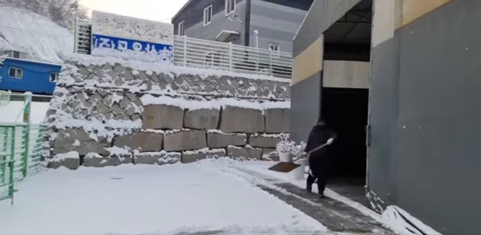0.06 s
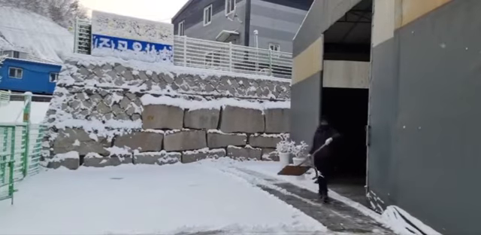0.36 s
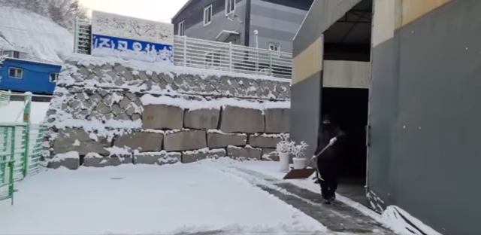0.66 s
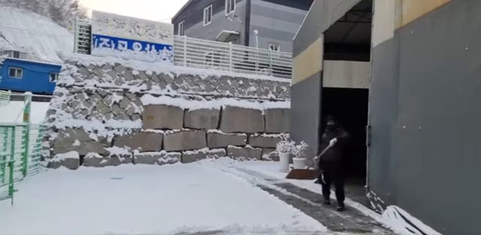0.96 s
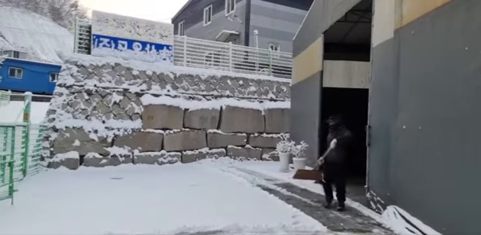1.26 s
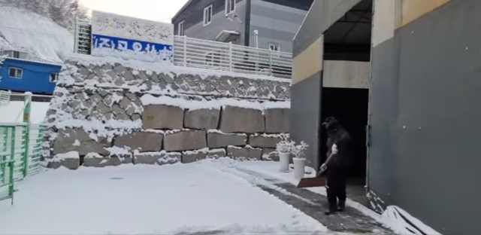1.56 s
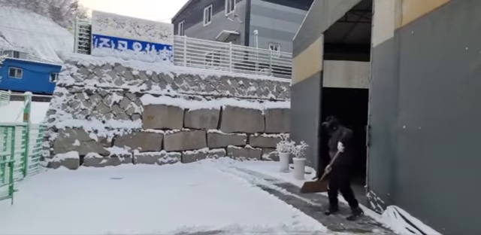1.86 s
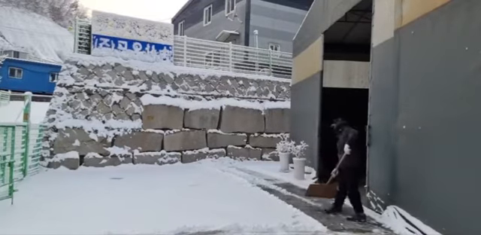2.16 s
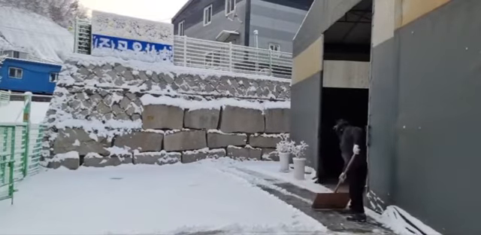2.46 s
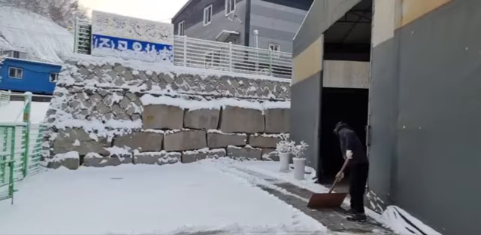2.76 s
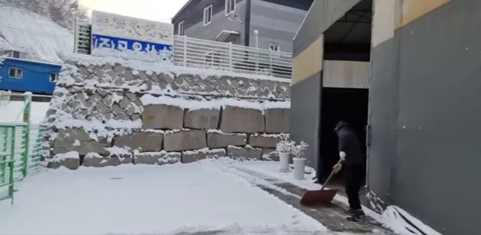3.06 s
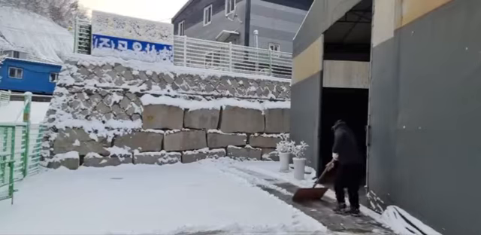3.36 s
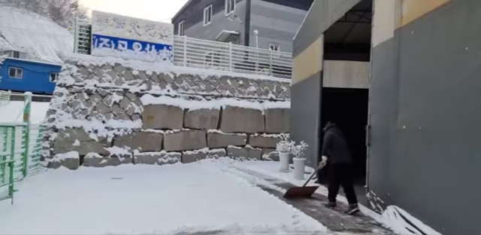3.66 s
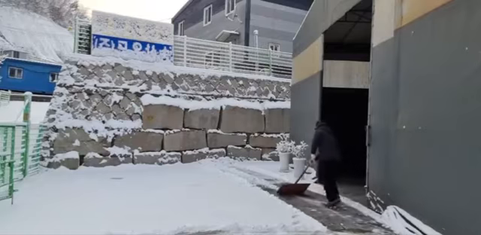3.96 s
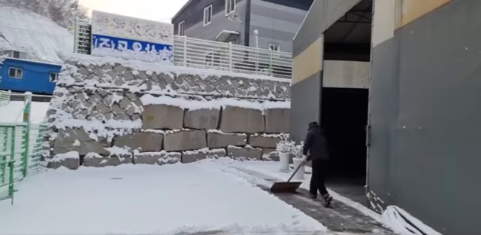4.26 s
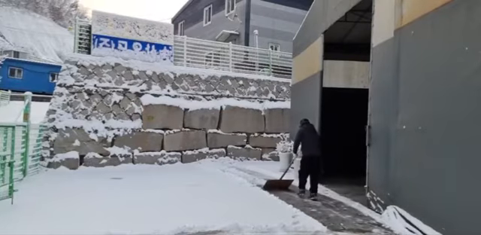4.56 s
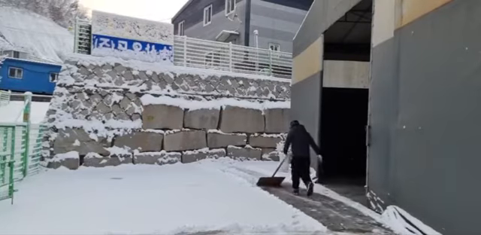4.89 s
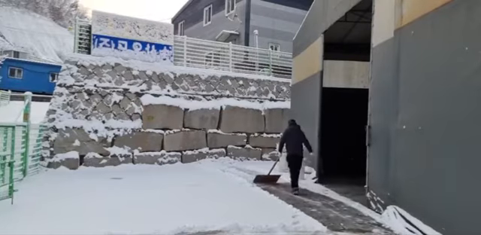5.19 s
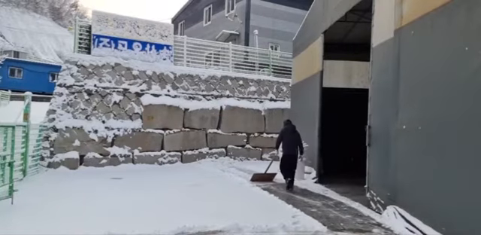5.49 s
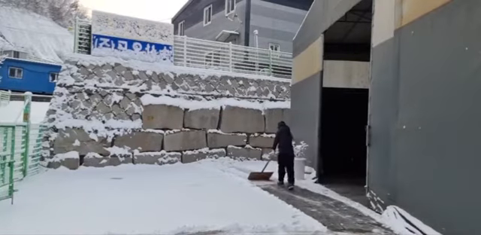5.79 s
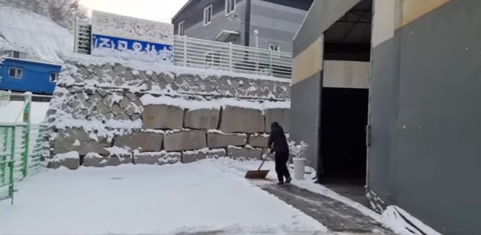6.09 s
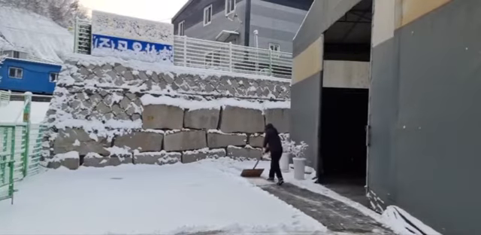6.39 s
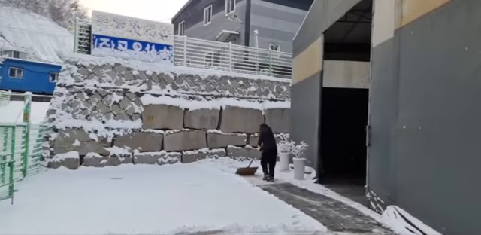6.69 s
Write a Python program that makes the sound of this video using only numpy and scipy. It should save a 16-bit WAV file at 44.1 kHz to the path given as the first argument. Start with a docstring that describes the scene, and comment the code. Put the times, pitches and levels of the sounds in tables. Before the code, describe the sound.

A plastic snow shovel scrapes over snowy pavers outdoors. First come a few quiet, crunching footsteps with sharp little clicks of grit, then a knock as the blade meets the ground. The push follows, a juddering rasp with a hollow rumble and a cluster of icy snaps in the middle, growing lighter as it moves off from the microphone. A faint, distant hum continues throughout.

```python
"""A plastic snow shovel is set down with a knock and pushed over snowy paving in a walled yard.
Its edge sticks and slips, rasping on the pavers, skimming now and then and cracking through frozen
crust, while bumps drum on the hollow scoop. Before the push, a few steps crunch on snow and grit,
and at the very start the carried shovel rattles faintly. A low outdoor hum lies underneath."""
import sys
import numpy as np
from scipy import signal
from scipy.fft import rfft, irfft
from scipy.io import wavfile

SR = 44100
rng = np.random.default_rng(int(sys.argv[2]) if len(sys.argv) > 2 else 0)


def dump_mix(stems):
    """Bounce the given channels to the path in sys.argv[1] as a 16-bit WAV at rate SR."""
    frames = np.atleast_2d(stems).T  # one column per channel
    limited = np.clip(frames, -1, 1)  # hard clip at full scale
    pcm = np.round(limited * 32767).astype(np.int16)
    wavfile.write(sys.argv[1], SR, pcm)


N = 297234


def from_db(db):
    """Decibels to gain."""
    return 10 ** (np.asarray(db) / 20)


def rms_one(x):
    """Scale to unit rms."""
    return x / np.sqrt(np.mean(x ** 2) + 1e-20)


def add(track, s, sound):
    """Lay a short sound into a track at s seconds."""
    at = round(s * SR)
    track[..., at:at + sound.shape[-1]] += sound[..., :N - at]


def gains(rows, before=None):
    """One gain curve for each dB column of a table."""
    s, *columns = np.transpose(rows)
    return [from_db(np.interp(np.arange(N) / SR, s, db, before)) for db in columns]


def swell(s, hold_s, attack_s, release_db_per_s):
    """Envelope of a contact: it builds, holds and dies away."""
    t = np.arange(N) / SR - s
    return np.clip(t / attack_s, 0, 1) * from_db(-release_db_per_s * np.maximum(t - hold_s, 0))


def burst(rise_s, t60):
    """Envelope of something that gives way within milliseconds and then crumbles."""
    t = np.arange(SR // 4) / SR
    return (1 - np.exp(-(t / rise_s) ** 2)) * from_db(-60 * t / t60)


def drift(rate_hz):
    """Smooth random modulation; rms 1."""
    pole = np.exp(-80 * np.pi * rate_hz / SR)
    slow = signal.lfilter([1], [1, -2 * pole, pole * pole], rng.standard_normal(N // 40 + 2002))[2000:]
    return np.interp(np.arange(N) / 40, np.arange(len(slow)), rms_one(slow))


def grains(per_s, spread_db):
    """Tiny impulses at random moments, a few larger than the rest; rms 1."""
    sizes = from_db(spread_db * np.minimum(rng.exponential(1, N), 4))
    return rms_one((rng.random(N) < per_s / SR) * sizes * rng.choice([-1, 1], N))


def response(spectrum, size=4096):
    """Minimum-phase impulse response of an EQ curve, falling 30 dB an octave beyond its ends."""
    hz, db = np.transpose(spectrum)
    octave = np.log2(np.maximum(np.arange(size // 2 + 1), .5) * SR / size)
    points = np.log2(hz)
    beyond = np.abs(octave - np.clip(octave, points[0], points[-1]))
    level = np.interp(octave, points, db) - 30 * beyond
    cepstrum = irfft(np.log(from_db(level) + 1e-5))
    cepstrum[1:size // 2] *= 2
    cepstrum[size // 2 + 1:] = 0
    return irfft(np.exp(rfft(cepstrum)))


def colour(x, spectrum):
    """Shape white sound with an EQ curve, keeping its power."""
    impulse = response(spectrum)
    return signal.oaconvolve(x, impulse / np.linalg.norm(impulse))[:N]


def ring(x, hz, t60):
    """One mode: a unit click starts a decaying sine of height 1."""
    pole, angle = from_db(-60 / (t60 * SR)), 2 * np.pi * hz / SR
    return signal.lfilter([0, np.sin(angle)], [1, -2 * pole * np.cos(angle), pole * pole], x + 1e-18)


def resonance(x, hz, width_hz):
    """Resonant band-pass with unity gain at its peak."""
    return signal.lfilter(*signal.iirpeak(hz, hz / width_hz, fs=SR), x + 1e-18)


# EQ of the outdoor bed: f/Hz, level/dB
HUM_EQ = [(25, 2), (45, -1), (70, 2), (105, -1.5), (150, 1), (210, -7), (305, -4.5), (430, -12), (560, -19),
          (850, -27), (1150, -37), (2500, -42), (7000, -47), (14000, -42)]
# Fader ride of the bed: t/s, level/dB, deep bass boost/dB
HUM_RIDE = [(0, -52, 3.5), (.6, -52, 0), (.9, -52.5, 0), (1.4, -52, 2), (1.9, -53.5, -1.5),
            (2.4, -47, -8.5), (2.65, -46, -5), (5.8, -50.5, -6)]
def outdoor_hum(trim_db=-2.0, bass_hz=204):
    """Distant low hum with a trace of hiss; its deep bass swells and sinks."""
    level, bass_gain = gains(HUM_RIDE)
    air = colour(rng.standard_normal(N), HUM_EQ)
    bass = signal.sosfiltfilt(signal.butter(2, bass_hz, fs=SR, output="sos"), air)
    return from_db(trim_db) * level * (air + (bass_gain - 1) * bass)


def yard(x, t60=0.16, send_db=-17.5, predelay_s=0.0161):
    """The walls add a short, faint tail."""
    t = np.arange(SR) / SR
    tail = rng.standard_normal(SR) * from_db(-60 * t / t60) * (t > predelay_s)
    band = signal.butter(1, [400, 6000], "band", fs=SR, output="sos")
    tail = signal.sosfilt(band, tail / np.linalg.norm(tail))
    return x + from_db(send_db) * signal.oaconvolve(x, tail)[:N]


# Fader ride of the rattle: t/s, level/dB
RATTLE_RIDE = [(0, -65), (.04, -63), (.1, -75.5), (.18, -70.5), (.23, -85), (.3, -120)]
# Thin modes of the carried shovel: f/Hz, level/dB, t60/s
RATTLE_MODES = [(1555, -11, 0.15), (1830, -5, 0.046), (2350, 2, 0.027), (2590, -7, 0.052),
                (2870, -11, 0.055), (3970, -6, 0.038)]
def rattle():
    """Light, quick touches keep the carried shovel ringing."""
    level, = gains(RATTLE_RIDE)
    touches = grains(per_s=770, spread_db=0.5)
    return level * rms_one(sum(from_db(db) * ring(touches, hz, t60) for hz, db, t60 in RATTLE_MODES))


# A sole lands or rolls: t/s, time under load/s, level/dB, crunch over grit/dB
STEPS = [(-0.01, 0.029, -62.5, 0), (0.485, 0.054, -56.5, 10), (0.58, 0.048, -61, -4.5),
         (1.148, 0.029, -65.5, 2.5), (1.235, 0.037, -76, 4), (1.579, .03, -59, 4),
         (1.617, 0.027, -53, -0.5), (1.71, 0.013, -63.5, -5), (1.935, .06, -77, 10), (2.06, 0.11, -80, 6),
         (2.287, 0.063, -70, -1.5), (2.477, 0.04, -59.5, 5), (2.504, 0.043, -52, -4)]
# EQs of the gritty body and the crunchy top of a step: f/Hz, level/dB
STEP_GRIT_EQ = [(400, 11), (900, 2.5), (1700, 3.5), (2400, 4), (3200, -0.5), (4500, -20)]
STEP_CRUNCH_EQ = [(2700, -17), (3700, -1), (4600, -4.5), (6000, -6), (8000, -6), (9500, -15.5),
                  (14500, -13.5)]
def steps(attack_s=0.012, settle_db=-16.5, clump_db=2.5):
    """Soles crush snow and grit in small clumps; the crushed snow keeps creaking faintly."""
    power = np.zeros((2, N))
    for s, hold_s, db, tilt_db in STEPS:
        load = swell(s, hold_s, attack_s, release_db_per_s=246)
        settling = from_db(settle_db) * swell(s, hold_s, attack_s, release_db_per_s=63)
        layers = from_db([db - tilt_db / 2, db + tilt_db / 2])
        power += np.outer(layers, np.maximum(load, settling)) ** 2
    grit, crunch = np.sqrt(power)
    crush = grains(per_s=8000, spread_db=3.0) * rms_one(from_db(clump_db * drift(100)))
    return colour(crush * grit, STEP_GRIT_EQ) + colour(crush * crunch, STEP_CRUNCH_EQ)


# Grit clicks under a shoe: t/s, level/dB, f/Hz, t60/s
CLICKS = [(0.491, -31.5, 3690, 0.07), (0.521, -43, 3670, 0.061), (0.547, -28.5, 3620, 0.038),
          (0.5694, -39.5, 3650, 0.04), (0.592, -37.5, 3180, 0.02), (0.621, -46, 3320, 0.022),
          (1.585, -44.5, 3750, 0.026), (1.642, -41.5, 1790, 0.055), (1.677, -45, 2000, 0.018),
          (1.7423, -41, 2710, 0.024)]
# Pitch-tracking EQ of a click: multiple of its pitch, level/dB
CLICK_EQ = [(.15, -3), (.27, -20), (.55, -6.5), (1.0, -1), (1.3, 3), (1.6, -7), (2.2, -14), (2.6, -24),
            (4.0, -23)]
def shoe_clicks(width_hz=190, upper_ratio=1.06, rise_s=0.00075):
    """Pinched grit cracks and rings briefly at two close pitches."""
    out = np.zeros(N)
    for s, db, hz, t60 in CLICKS:
        crumble = from_db(db) * burst(rise_s, t60) * rng.standard_normal(SR // 4)
        crack = colour(crumble, [(ratio * hz, level) for ratio, level in CLICK_EQ])
        rings = sum(resonance(crack, pitch, width_hz) for pitch in (hz, upper_ratio * hz))
        add(out, s, (crack + rings) / 2)
    return out


# The scoop hits the ground and rebounds: t/s, level/dB, contact brightness/Hz
KNOCKS = [(2.6745, -14, 1000), (2.681, -10.5, 352), (2.696, -17, 500), (2.7022, -15.5, 600),
          (2.716, -20, 200), (2.913, -31.5, 500), (3.296, -13.5, 90.5), (3.552, -29, 920),
          (4.156, -28, 398), (4.246, -25.5, 393), (4.772, -25.5, 445)]
# Modes of scoop and shaft: f/Hz, level/dB, t60/s
SCOOP_MODES = [(93, -5, 0.12), (127, -7, 0.074), (250.5, -4, 0.071), (310, -7, 0.084), (445, -11.5, 0.045),
               (500, -18.5, 0.04), (600, -6, 0.06), (670, -3, 0.054), (756, -31, 0.06), (880, -28, 0.047),
               (1150, -18, 0.08), (1440, -23, 0.055), (1760, -27, 0.046)]
def knocks(tick_db=-26.0, tick_t60=0.069):
    """Cushioned blows set the scoop ringing, with a faint tick of grit."""
    force, grit, t = np.zeros(N), np.zeros(N), np.arange(SR // 5) / SR
    for s, db, hz in KNOCKS:
        contact = t * np.exp(-2 * np.pi * hz * t)
        add(force, s, -from_db(db) * contact / contact.sum())
        add(grit, s, from_db(db + tick_db - 60 * t / tick_t60))
    body = sum(from_db(db) * ring(force, hz, t60) for hz, db, t60 in SCOOP_MODES)
    low_cut = signal.butter(4, 55, "high", fs=SR, output="sos")   # the ringing carries no deep bass
    tick_eq = [(500, 10.0), (1700, -4.5), (2800, -12.5), (7500, -20.0), (14000, -36)]
    return signal.sosfilt(low_cut, body) + colour(grit * rng.standard_normal(N), tick_eq)


# Resonances of the blade edge: f/Hz, width/Hz, level/dB
EDGE_MODES = [(1130, 21, 4.5), (1660, 115, -3.5), (2166, 32, -8), (2743, 54, -1), (2920, 38, -5),
              (3140, 50, 3), (3316, 120, 0.5), (4270, 10, 1.5), (4680, 74, -14), (4810, 47, 4),
              (5450, 110, 0), (5650, 170, 1), (6380, 36, -9), (7370, 130, 2), (7940, 110, 3)]
def blade(x, ring_db=0.0, wander_db=3.5):
    """The edge rings with whatever grates on it; as the contact moves along it, modes come and go."""
    out = x.copy()
    for hz, width_hz, db in EDGE_MODES:
        strength = from_db(db + ring_db + wander_db * drift(1.4))
        out += strength * resonance(x, hz, width_hz)
    return out


# Ice snaps under the blade: t/s, level/dB, bright over mid crack/dB
SNAPS = [(2.6735, -49, 3), (2.9107, -36, -5), (3.1323, -35, -7), (3.1365, -37.5, -18), (3.1692, -37, -8),
         (3.2344, -32, -3), (3.274, -45.5, -8), (3.518, -42, -12), (3.549, -35.5, -9), (3.8975, -38.5, -9),
         (4.0098, -34.5, 1), (4.0235, -30.5, 1), (4.0372, -37.5, 13), (4.0505, -34, -1), (4.0768, -37, -2),
         (4.113, -32.5, 4.5), (4.1304, -34.5, 2), (4.1532, -28, -2), (4.1802, -29.5, 3), (4.2188, -37.5, 7),
         (4.2412, -30, 3), (4.3276, -32.5, 7), (4.771, -37, -13), (4.958, -39.5, 7), (5.0102, -45.5, 12),
         (5.103, -46, 15), (5.432, -51, -15), (6.3675, -51, -2), (6.5205, -42.5, -7), (6.608, -49.5, -10.5)]
# EQs of the three layers of a snap: f/Hz, level/dB
THUD_EQ = [(50, -12), (110, 0), (350, -1), (600, -9), (1200, -22)]
MID_CRACK_EQ = [(700, -20), (1200, -4), (2200, -3), (3300, 0), (4100, 0), (5500, -16)]
BRIGHT_CRACK_EQ = [(3000, -28), (4400, 2.5), (5600, 4.5), (7600, 1.5), (9500, -6.5), (14500, -11)]
def ice_snaps(thud_db=-1.5, bright_db=3.0, click_db=10.0, rise_s=0.0021, t60=0.031):
    """A lump of ice breaks with one sharp click in a burst of grains, and thumps the scoop."""
    crumble, clicks = np.zeros((3, N)), np.zeros((3, N))
    for s, db, tilt_db in SNAPS:
        layers = from_db([db, db - tilt_db / 2, db + tilt_db / 2])[:, None]
        add(crumble, s, layers * burst(rise_s, t60))
        add(clicks, s + rise_s, layers * from_db(click_db))
    thud, mid, bright = clicks + crumble * grains(per_s=16000, spread_db=0.5)
    cracks = colour(mid, MID_CRACK_EQ) + colour(bright * from_db(bright_db), BRIGHT_CRACK_EQ)
    return blade(cracks, ring_db=-4.0) + colour(thud * from_db(thud_db), THUD_EQ)


def pebbles(level_db=-8.0, t60=0.045, count=32):
    """Single stones are flicked from under the edge; each pings at a pitch of its own."""
    flicks = grains(per_s=220, spread_db=1.0)
    stone = rng.integers(0, count, N)
    pitches = np.geomspace(760, 6500, count) * rng.uniform(.97, 1.03, count)
    pings = sum(ring(flicks * (stone == k), hz, t60) for k, hz in enumerate(pitches))
    return from_db(level_db) * rms_one(pings)


def crust_growl(drive, level_db=-7.5):
    """Breaking crust makes the wall of the scoop growl."""
    fractures = grains(per_s=2800, spread_db=1.5)
    return from_db(level_db) * drive * rms_one(resonance(fractures, hz=360, width_hz=150))


# EQs of the scoop's rumble, near and far: f/Hz, level/dB
RUMBLE_NEAR_EQ = [(30, -21), (42, -10), (62, 0.5), (86, 4.5), (130, 0.5), (175, -12), (215, -3.5),
                  (305, -7.5), (415, -8), (520, -13), (600, -8), (700, -17.5), (900, -14)]
RUMBLE_FAR_EQ = [(30, -25), (62, 4), (90, -5), (135, 2.5), (210, -5), (305, -3.5), (400, -12), (520, -10),
                 (690, -34.5), (790, -14), (900, -28)]
# Crossfade as the shovel moves off: t/s, far share/0-1
FAR_FADE = [(4.9, 0.32), (5.4, 0.77)]
def scoop_rumble(drive):
    """Bumps in the paving drum on the hollow scoop; its boom thins as it moves off."""
    bumps = drive * grains(per_s=2500, spread_db=1.5)
    far = np.interp(np.arange(N) / SR, *np.transpose(FAR_FADE))
    return colour(bumps * (1 - far), RUMBLE_NEAR_EQ) + colour(bumps * far, RUMBLE_FAR_EQ)


def stick_slip(judder_db=0.22, catches_per_s=55, catch_size=0.83, release_s=0.0097):
    """Force at the edge: it judders, and jumps each time it catches a stone; rms 1."""
    jumps = (rng.random(N) < catches_per_s / SR) * rng.uniform(.3, 1.5, N)
    catches = signal.lfilter([1], [1, -np.exp(-1 / (release_s * SR))], jumps + 1e-18)
    return rms_one(from_db(judder_db * drift(51)) + catch_size * catches)


# Fader rides of the push: t/s, scoop rumble/dB, edge rasp/dB, treble boost from icy ground/dB
PUSH_RIDE = [(2.745, -42, -51.5, -3), (2.93, -37.5, -49, 0.5), (3.08, -34, -47.5, 1),
             (3.25, -43, -52.5, 0.5), (3.43, -35, -48, -1), (3.62, -41.5, -47.5, 0),
             (3.88, -33.5, -45, 3.5), (3.99, -38, -44.5, 9.5), (4.25, -35.5, -45, 7.5),
             (4.42, -41.5, -45.5, 3), (4.66, -43.5, -46.5, 2.5), (4.9, -46, -51, 5.5),
             (5.16, -44, -48.5, 5.5), (5.29, -49, -50.5, 3), (5.42, -50.5, -43, -6), (5.64, -52, -48.5, -8),
             (5.94, -47.5, -48, -5), (6.1, -42, -47, -3), (6.74, -40.5, -52.5, 0.5)]
# The blade rides up and skims: t/s, length/s, dip/dB
SKIMS = [(3.18, 0.015, 16), (3.555, .045, 6), (5.198, 0.046, 3.5), (5.299, 0.037, 10), (5.674, 0.19, 14)]
# The blade ploughs through frozen crust: t/s, length/s, level/dB
CRUSTS = [(3.931, 0.052, -35.5), (4.248, 0.032, -35.5), (4.33, 0.018, -33.5), (4.42, 0.14, -34.5),
          (4.941, 0.021, -43), (5.089, 0.07, -37.5)]
def blade_load(crunch_db=-6.5, spray_db=-13.0, crunch_ice_share=0.4):
    """Envelopes of rumble, rasp, crunch and spray: all duck on a skim and rise in crust."""
    rumble, rasp, icy = gains(PUSH_RIDE, before=-120)
    crunch = rasp * icy ** crunch_ice_share * from_db(crunch_db)
    spray = rasp * icy * from_db(spray_db)
    dip_db = sum(db * swell(s, hold_s, attack_s=0.025, release_db_per_s=750) for s, hold_s, db in SKIMS)
    paving = from_db(-dip_db) * np.array([rumble, rasp, crunch, spray])
    patches = [from_db(db) * swell(s, hold_s, attack_s=0.016, release_db_per_s=400)
               for s, hold_s, db in CRUSTS]
    crust_mix = from_db([-15, -12.5, 0, -9])   # rumble, rasp, crunch, spray
    return np.hypot(paving, np.outer(crust_mix, np.max(patches, axis=0)))


# EQs of stone rasp, ice crunch and fine spray: f/Hz, level/dB
RASP_EQ = [(410, -3.5), (700, -5), (997, -11.5), (1150, -1), (1310, -1.5), (1630, -0.5), (2290, -1),
           (3260, -1), (4400, -1.5), (5720, -32.5), (9680, -120)]
CRUNCH_EQ = [(2350, -6), (4000, -3), (5120, 1.5), (5550, -4), (6050, -2), (7610, -1.5), (8600, -7.5),
             (11200, -45.5), (18900, -120)]
SPRAY_EQ = [(4820, -35.5), (8200, -3), (10100, -9.5), (14000, -4.5), (14600, -12.5), (15000, -23)]
def scrape(rasp_db=-3.5, crunch_db=-3.5, spray_db=1.5):
    """Each slip of the shovel's edge sheds a flurry of grains and shakes the scoop."""
    rumble, rasp, crunch, spray = blade_load()
    slips = stick_slip()
    stone = slips * grains(per_s=7000, spread_db=3.5)
    ice = slips * grains(per_s=10000, spread_db=0.0)
    edge = colour(stone * rasp * from_db(rasp_db), RASP_EQ)
    edge += colour(ice * crunch * from_db(crunch_db), CRUNCH_EQ)
    sizzle = colour(ice * spray * from_db(spray_db), SPRAY_EQ)
    scoop = scoop_rumble(slips * rumble) + crust_growl(slips * crunch)
    return blade(edge) + rasp * pebbles() + sizzle + scoop


# Stereo width: f/Hz, side level/dB
SIDE_EQ = [(30, -19), (70, -18), (180, -30), (350, -32), (700, -26), (1400, -24), (5000, -25), (7000, -23),
           (9500, -14), (13000, -10.5)]
def scene():
    """Everything sits in the centre; mainly scattered treble differs between the ears."""
    mid = yard(rattle() + steps() + shoe_clicks() + knocks() + scrape() + ice_snaps()) + outdoor_hum()
    scatter = rng.standard_normal(SR // 50)
    widener = np.convolve(scatter / np.linalg.norm(scatter), response(SIDE_EQ))
    side = signal.oaconvolve(mid, widener)[:N]
    return np.array([mid + side, mid - side])


# EQ of the microphone hiss: f/Hz, level/dB
HISS_EQ = [(4000, -16), (6500, -3), (8000, -1.5), (10000, -4), (14500, 2.5)]
def record(dry, hiss_db=-84, low_cut_hz=38, high_cut_hz=14900):
    """Each small microphone hisses faintly and loses the deepest bass; the top is cut steeply."""
    hiss = from_db(hiss_db) * np.array([colour(noise, HISS_EQ) for noise in rng.standard_normal((2, N))])
    thin = signal.sosfilt(signal.butter(2, low_cut_hz, "high", fs=SR, output="sos"), dry + hiss)
    return signal.sosfilt(signal.ellip(12, .2, 80, high_cut_hz, fs=SR, output="sos"), thin)


dry = scene()
out = record(dry)
dump_mix(out)
```